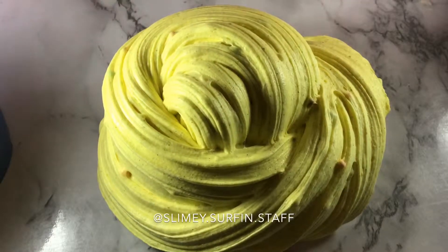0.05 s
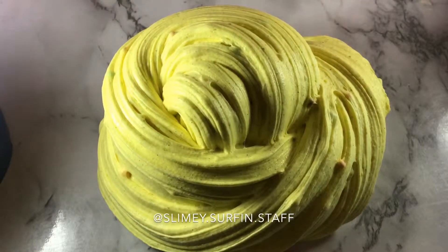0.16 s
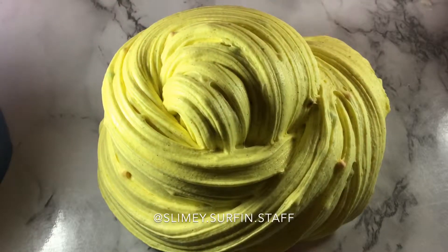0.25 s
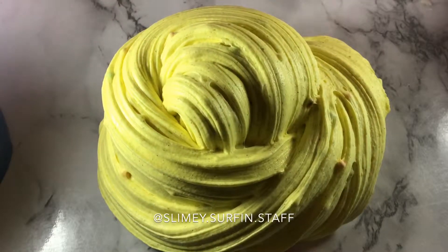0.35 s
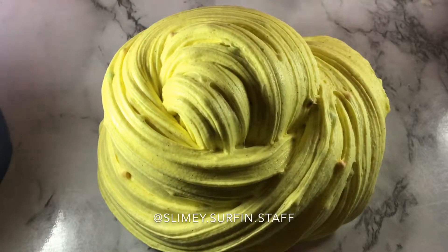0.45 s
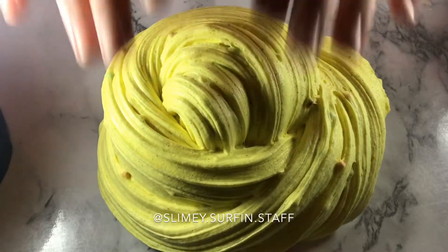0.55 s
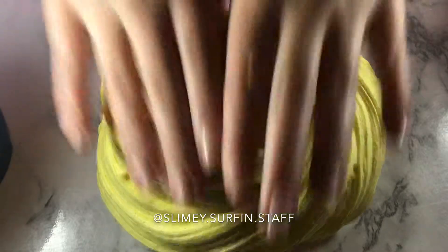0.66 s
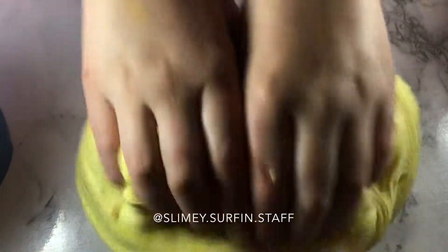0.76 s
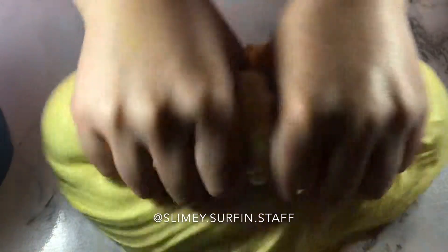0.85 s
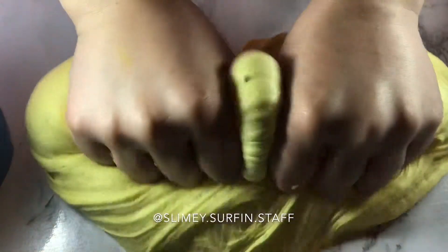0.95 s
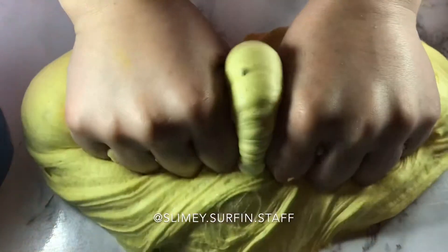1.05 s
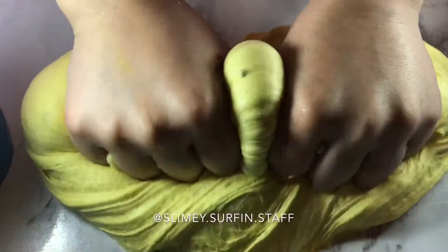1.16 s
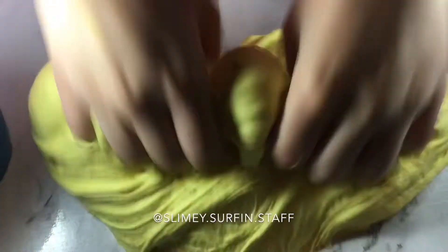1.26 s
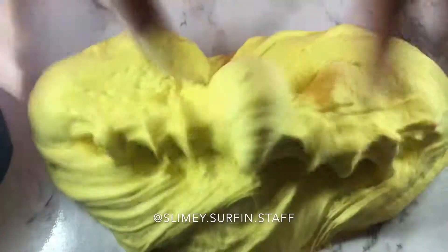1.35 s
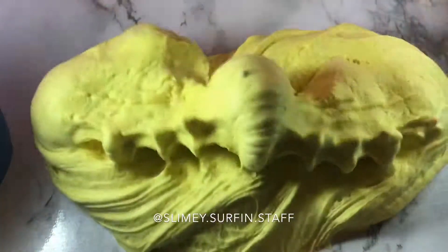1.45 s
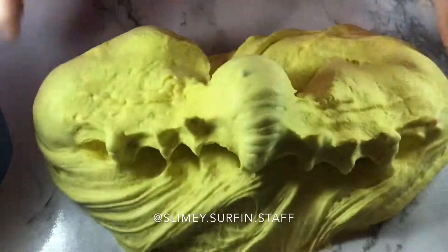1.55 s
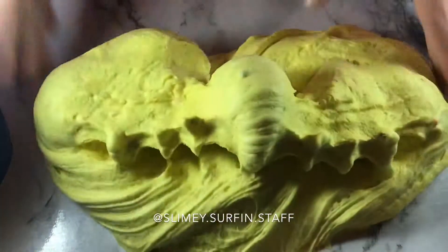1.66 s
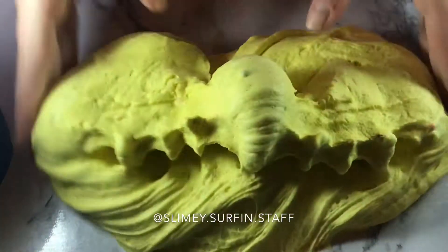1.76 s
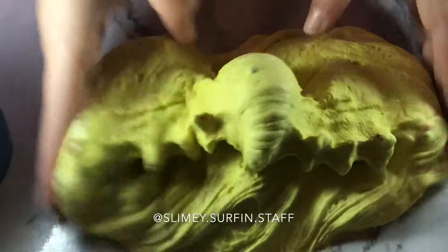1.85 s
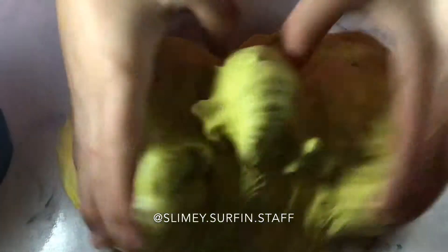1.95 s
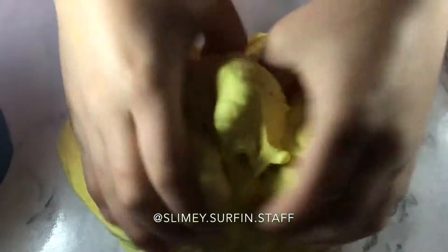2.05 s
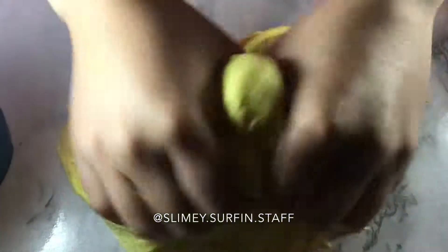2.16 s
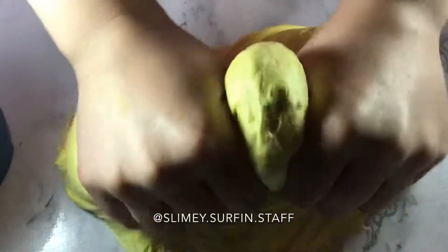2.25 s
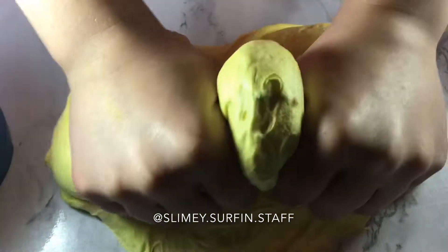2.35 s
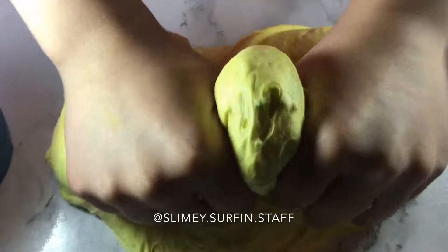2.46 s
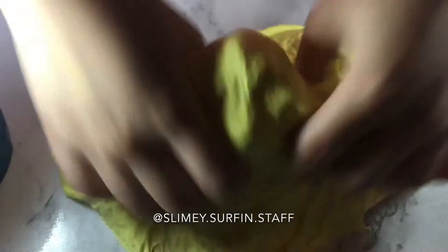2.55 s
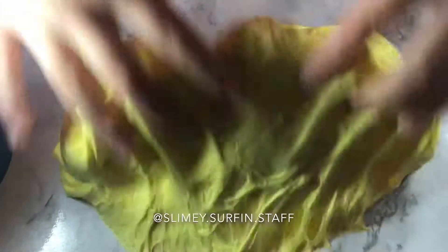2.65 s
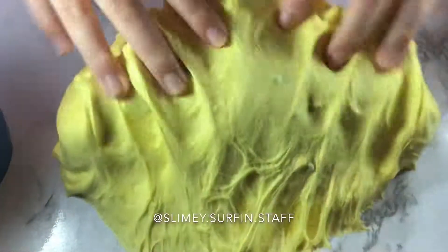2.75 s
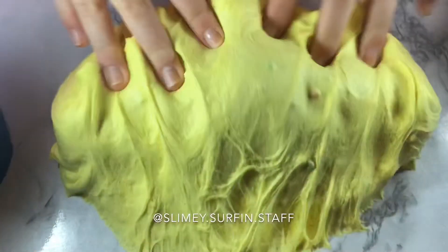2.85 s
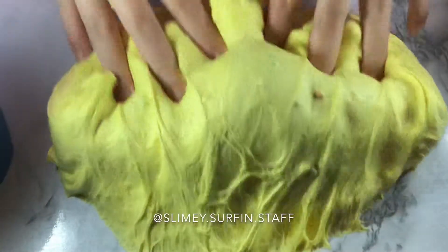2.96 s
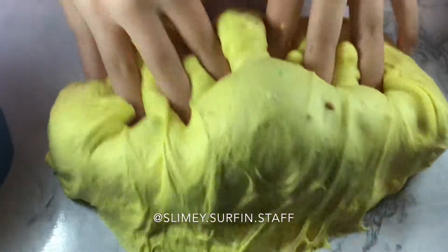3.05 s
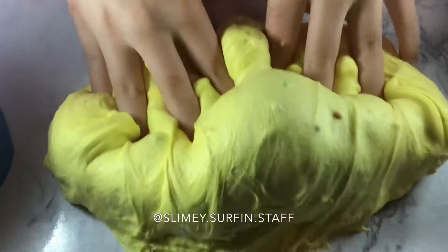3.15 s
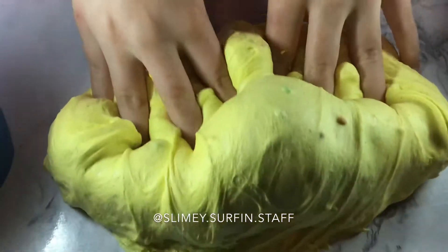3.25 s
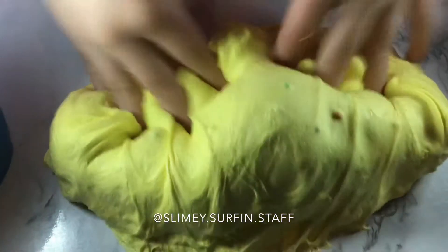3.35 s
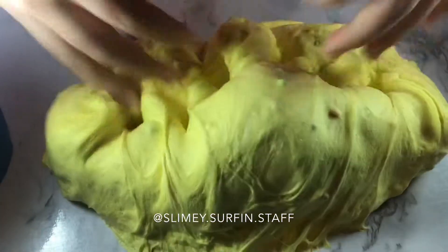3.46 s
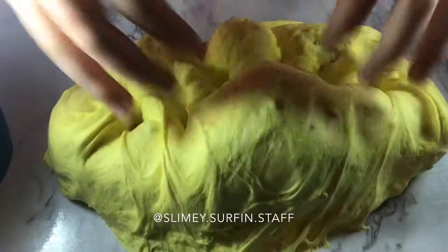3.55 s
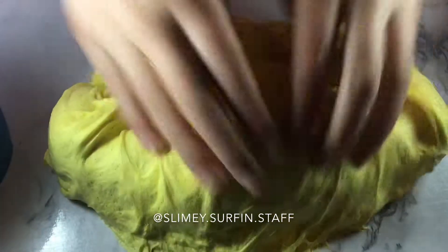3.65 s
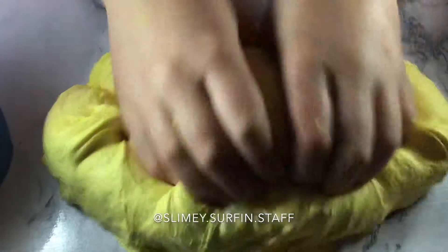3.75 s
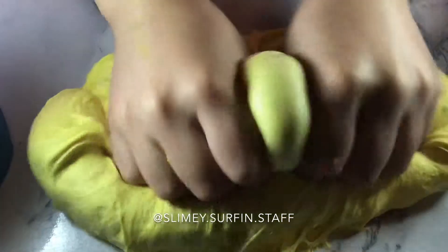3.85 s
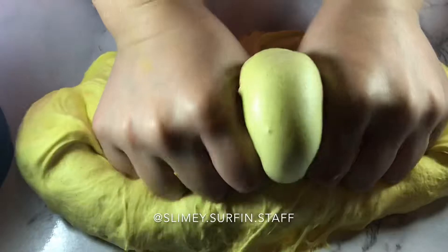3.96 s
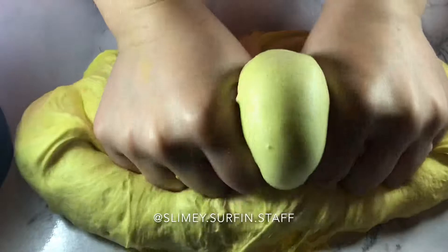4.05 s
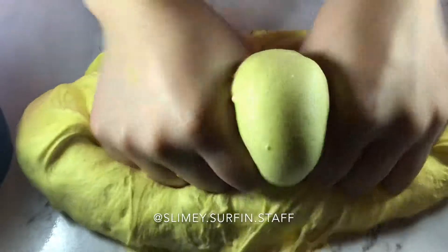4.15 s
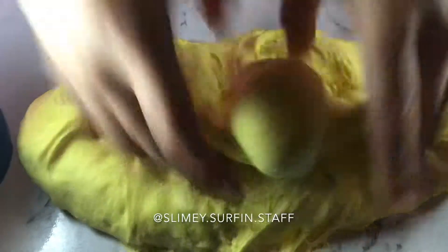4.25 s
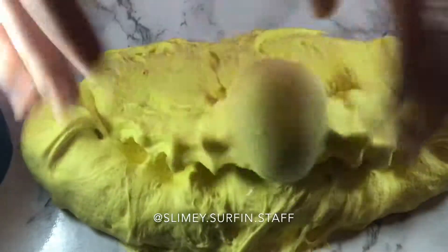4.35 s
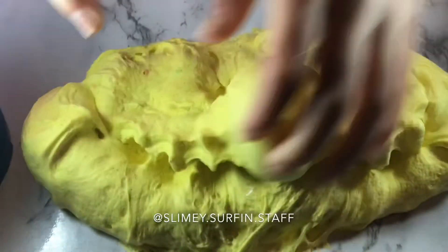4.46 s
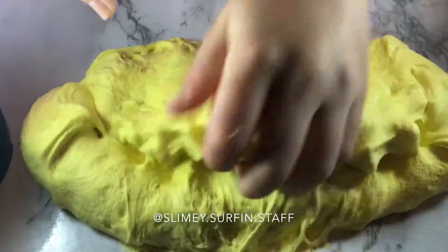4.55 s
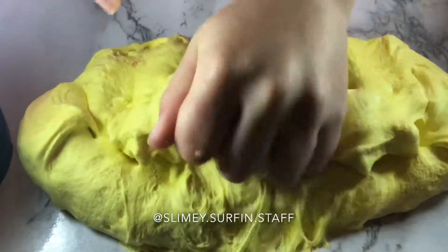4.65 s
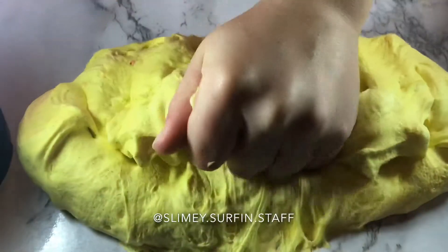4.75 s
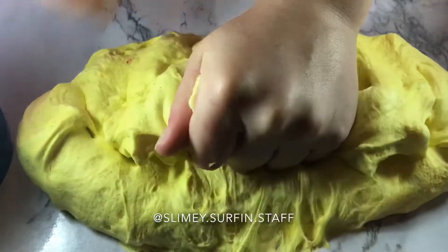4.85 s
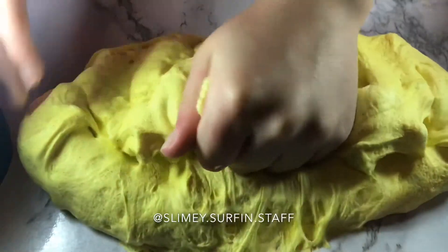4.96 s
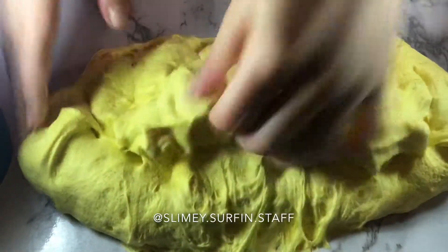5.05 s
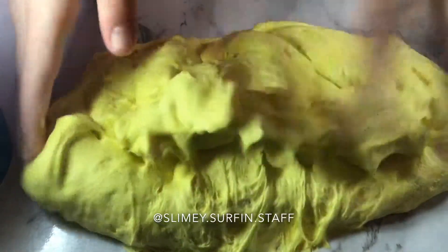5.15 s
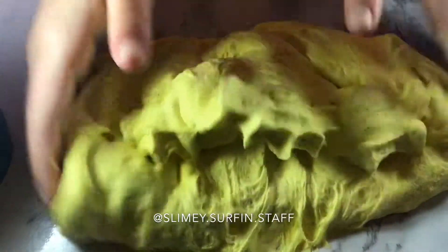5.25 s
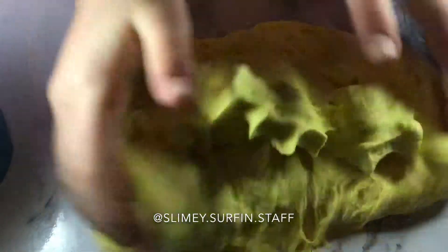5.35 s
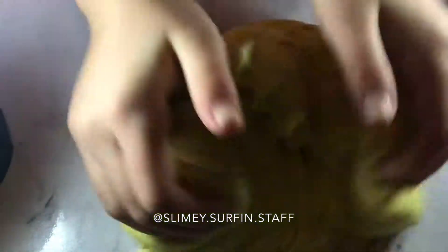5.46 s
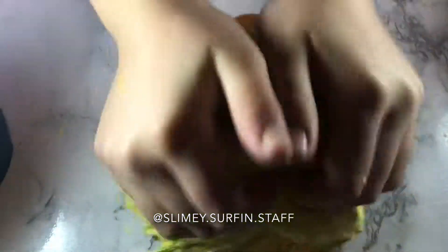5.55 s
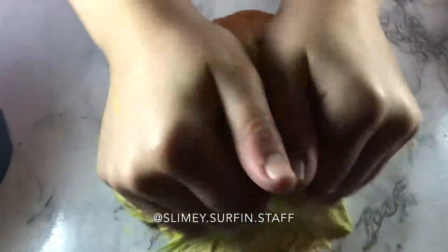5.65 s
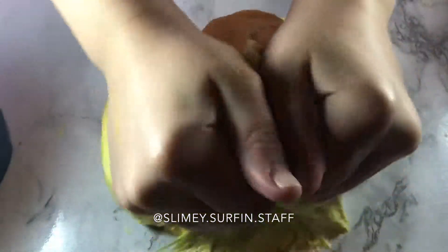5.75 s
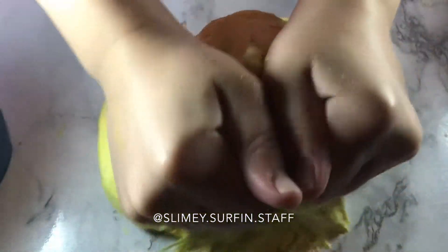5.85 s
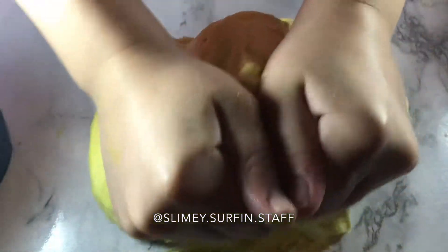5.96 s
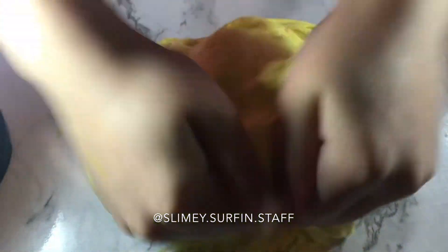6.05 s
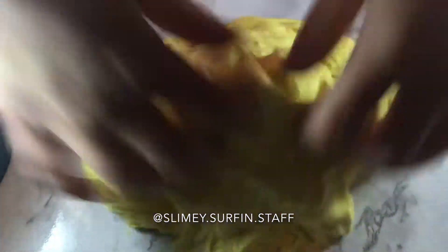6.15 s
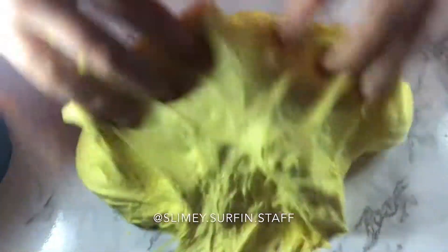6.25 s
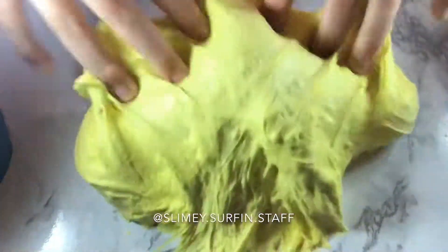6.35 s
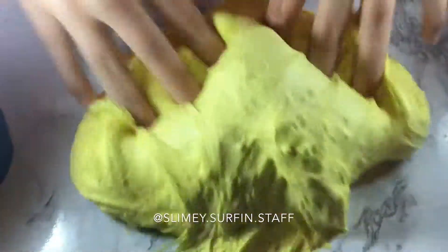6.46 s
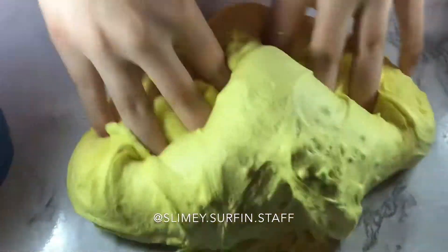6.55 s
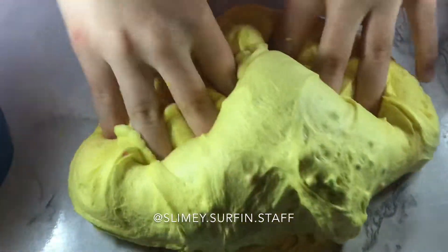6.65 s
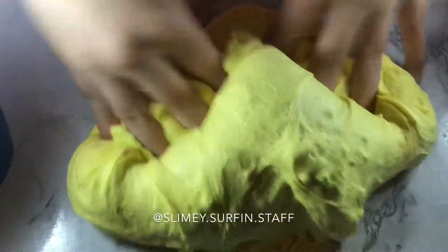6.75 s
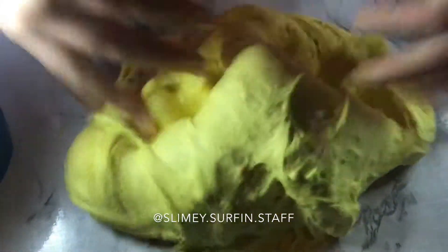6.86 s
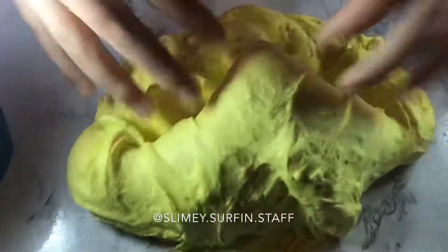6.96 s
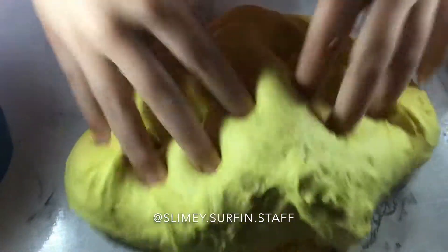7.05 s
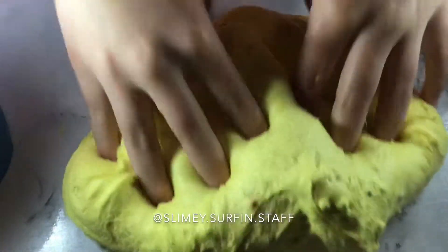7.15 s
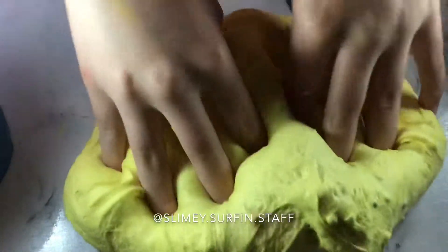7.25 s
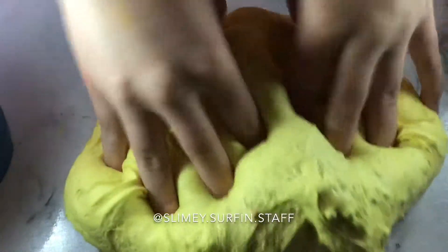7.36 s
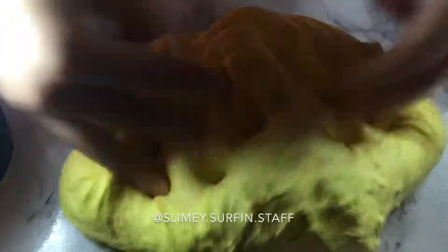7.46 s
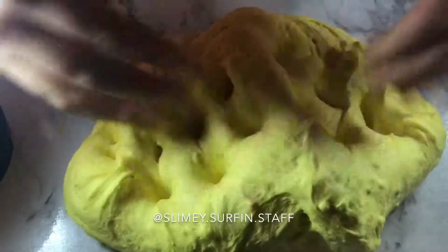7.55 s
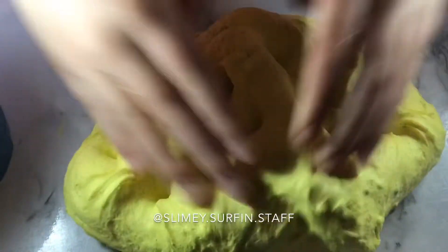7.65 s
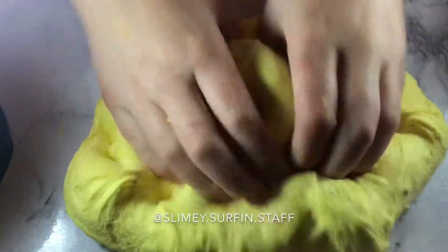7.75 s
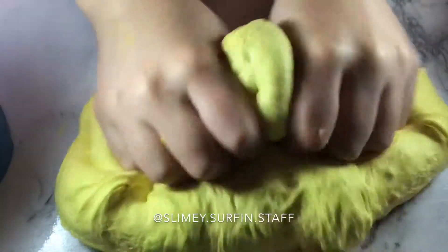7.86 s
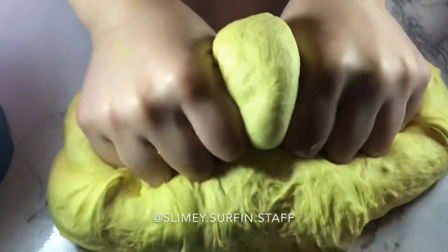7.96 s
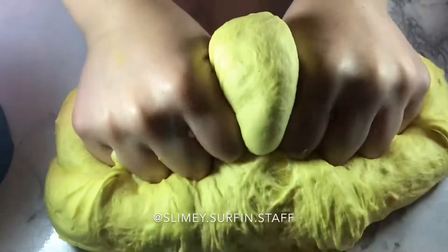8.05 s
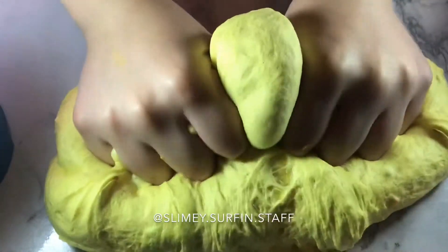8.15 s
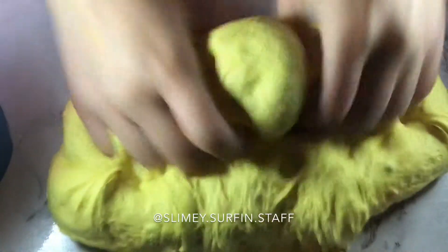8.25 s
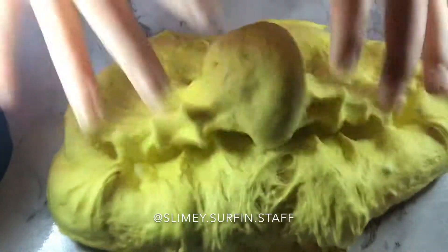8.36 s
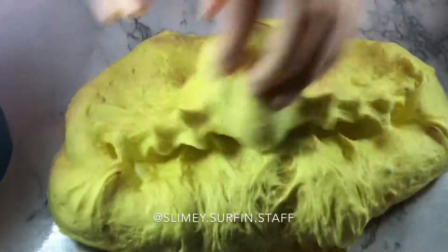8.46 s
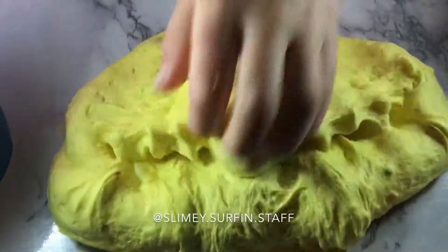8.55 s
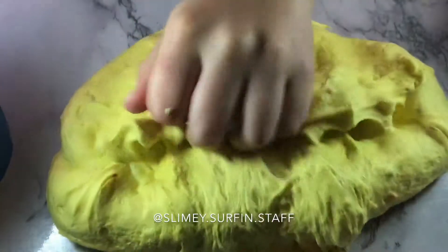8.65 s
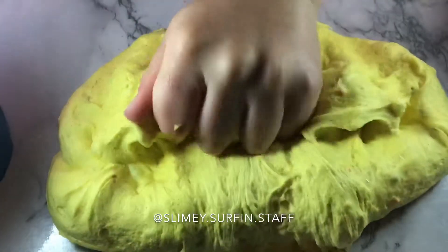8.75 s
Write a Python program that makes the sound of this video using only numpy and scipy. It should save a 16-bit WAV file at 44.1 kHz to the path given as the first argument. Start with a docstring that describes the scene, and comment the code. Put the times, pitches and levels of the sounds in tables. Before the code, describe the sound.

Thick airy slime is squeezed and pulled on a stone counter, bursting in crisp pops and fizzing crackles over a faint low hum.

```python
"""Two hands knead a lump of foamy slime on a stone counter, close to a small microphone, for 8.8 s.
Mains hum, a distant rumble and soft room noise lie below throughout, and the foam ticks even at rest.
From 0.8 s squeezes burst its air pockets: hissing fizz from tiny cells, ringing pops and puffs from larger ones.
From 1 s tugs ring as low thuds; from 1.4 s fingers peel out with a wet rush and a dull settling tail.
Air hisses harshly from a pinhole at 4.8 s; short rough whistles squeak at 5.9 s."""
import sys
import numpy as np
from scipy import signal
from scipy.fft import rfft, irfft
from scipy.io import wavfile
from scipy.ndimage import uniform_filter1d

SR = 44100
rng = np.random.default_rng(int(sys.argv[2]) if len(sys.argv) > 2 else 0)


def dump_mix(stems):
    """Bounce the given channels to the path in sys.argv[1] as a 16-bit WAV at rate SR."""
    frames = np.atleast_2d(stems).T  # one column per channel
    limited = np.clip(frames, -1, 1)  # hard clip at full scale
    pcm = np.round(limited * 32767).astype(np.int16)
    wavfile.write(sys.argv[1], SR, pcm)


def voltage_ratio(level):
    """Linear amplitude factor for a level in decibels (scalar or array-like)."""
    return 10 ** (np.asarray(level, float) / 20)


N = 388080   # samples

# fingers peeling out of the slime: start_s, hold_s, level_db, change_db over the hold,
# settle_db (level of the settling after it)
PEEL_MOVES = [(1.359, 0.052, -29.5, 1, -28), (2.632, 0.12, -31.5, -15, -42.5),
              (3.475, .08, -29.5, -11, -42.5), (4.245, 0.1, -39, 8.5, -42.5), (5.09, 0.084, -39.5, 1, -52),
              (6.129, 0.13, -39.5, -5, -54), (6.872, .07, -32, -9.5, -35.5), (7.503, 0.061, -30, -5, -41.5),
              (8.303, 0.092, -34.5, -0.5, -45)]


def rms_one(x):
    """Scales x to rms 1."""
    return x / np.sqrt(np.mean(x ** 2) + 1e-20)


def in_time(rows):
    """Straight lines through rows of (s, values), read at every sample."""
    s, *columns = np.transpose(rows)
    return [np.interp(np.arange(N) / SR, s, c) for c in columns]


def coloured(x, spectrum):
    """Weights x by a spectrum (Hz, relative dB per Hz), straight over log frequency; rms 1."""
    hz = np.maximum(np.fft.rfftfreq(N, 1 / SR), 1)
    points = np.array(spectrum)
    gain_db = np.interp(np.log(hz), np.log(points[:, 0]), points[:, 1])
    return rms_one(irfft(rfft(x) * voltage_ratio(gain_db), N))


def drift(rate_hz):
    """Slow random wander of rms 1, mostly below rate_hz."""
    r = np.exp(-2 * np.pi * rate_hz / SR)
    wander = signal.lfilter([1], [1, -2 * r, r * r], rng.standard_normal(N + SR))
    return rms_one(wander[SR:])   # the first second lets the filter settle


def ring(x, hz, cycles):
    """A resonance: a unit click rings about 1 high and dies 60 dB in so many cycles."""
    r = voltage_ratio(-60 * hz / (cycles * SR))
    w = 2 * np.pi * min(hz, .45 * SR) / SR
    return signal.lfilter([0, np.sin(w)], [1, -2 * r * np.cos(w), r * r], x + 1e-18)


def clicks(per_s, spread_db):
    """Random clicks of either sign, mostly small, a few large."""
    sizes = voltage_ratio(spread_db * np.minimum(rng.exponential(1, N), 4)) * rng.choice([-1, 1], N)
    return sizes * (rng.random(N) < per_s / SR)


def add(out, s, piece):
    """Lays a piece into out at s seconds."""
    at = round(s * SR)
    out[at:at + len(piece)] += piece[:N - at]


def patches(spectrum, per_s, spread_db, hiss_db, shared, patchy_db):
    """Noise in narrow bands, each lit by its own short bursts and by shared ones, swelling unevenly; rms 1."""
    out, edges, white = 0, np.geomspace(130, 16500, 13), rng.standard_normal((2, N))
    common = np.abs(clicks(per_s, spread_db))
    for k, (low, high) in enumerate(zip(edges, edges[1:])):
        fade = np.exp(-1 / (SR * (0.00061 + 0.55 / low)))   # low bursts last longer
        own = np.abs(clicks(per_s, spread_db))
        bursts = signal.lfilter([1], [1, -fade], shared * common + own)
        band_pass = signal.butter(2, [low, high], "band", fs=SR, output="sos")
        band = signal.sosfilt(band_pass, white[k % 2])
        swell = voltage_ratio(patchy_db * drift(40))
        lit = rms_one(band * (rms_one(bursts) + voltage_ratio(hiss_db)) * swell)
        out = out + lit * np.sqrt(high - low)
    return coloured(out, spectrum)


def gesture(start, hold, rise, fall, level_db, change_db):
    """Level in dB of one hand movement: a straight rise, a sloping hold, a straight fall."""
    fade_db = 20   # gained over one rise time, lost over one fall time
    far = 10       # rise or fall times drawn before the level stays flat
    end_db = level_db + change_db
    return in_time([(start - far * rise, level_db - far * fade_db),
                    (start, level_db),
                    (start + hold, end_db),
                    (start + hold + far * fall, end_db - far * fade_db)])[0]


def together(levels_db):
    """Levels in dB add as powers."""
    return 10 * np.log10(sum(voltage_ratio(2 * level) for level in levels_db))


def room():
    """Mains hum that wavers a little, a distant rumble as low resonant noise, and soft broad noise."""
    # mains tones: pitch_hz, level_db (rms)
    hum_tones = [(120, -55.5), (240, -77.5)]
    # colour of the room noise: frequency_hz, relative_db_per_hz
    room_colour = [(88, -29), (150, -8), (193, -12), (235, -1.5), (270, -8), (601, -18), (3620, -25.5),
                   (7470, -29), (16000, -28.5)]
    t = np.arange(N) / SR
    waver = voltage_ratio(0.41 * drift(7.7))
    hum = sum(voltage_ratio(level_db) * np.sqrt(2) * np.sin(2 * np.pi * hz * t) for hz, level_db in hum_tones)
    rumble = ring(rng.standard_normal(N), 68, cycles=1.3)
    rumble = signal.sosfilt(signal.butter(2, 40, "high", fs=SR, output="sos"), rumble)
    soft = coloured(rng.standard_normal(N), room_colour)
    return waver * hum + voltage_ratio(-59.5) * rms_one(rumble) + voltage_ratio(-68) * soft


def pressure():
    """Fizz level below and above 6 kHz from squeezes, peels and rest; peeling out ends a squeeze."""
    # hands pressing the foam: peak_s, rise_s and fall_s (time per 20 dB), fizz_db below 6 kHz,
    # bright_db (above 6 kHz against below)
    squeezes = [(0.838, 0.036, 0.07, -42, -9.5), (0.971, 0.126, 0.28, -46.5, 3.5),
                (1.82, 0.083, .6, -66, 1.5), (2.08, 0.2, 1.05, -51, -1.5), (2.339, 0.1, 0.12, -41, 3.5),
                (2.46, 0.28, 0.059, -48.5, 2), (2.96, 0.12, 0.74, -60.5, -6),
                (3.802, 0.036, 0.36, -50, -2.5), (3.91, 0.087, 0.41, -50.5, -5.5),
                (4.05, 0.081, 0.067, -36.5, 4), (4.801, 0.068, 0.13, -38.5, -2.5),
                (4.449, 0.2, 0.073, -64, -3.5), (5.25, 0.047, 0.18, -72, -5.5),
                (5.49, .2, 0.22, -47.5, -4.5), (5.671, 0.48, .03, -50, -0.5), (5.876, 0.17, 0.12, -43, 5),
                (5.965, .2, .04, -53.5, 3), (6.301, 0.18, 1.27, -62.5, -1), (7.173, 0.096, 0.69, -57.5, -5),
                (7.801, 0.043, 0.75, -56, 0), (8.042, 0.18, 0.11, -39.5, -2), (8.17, 0.45, 0.037, -57.5, 9),
                (8.449, 0.15, 1.5, -76.5, -5), (8.8, 0.66, .1, -52.5, -6.5)]
    let_go_lag_s, let_go_s = 0.08, 0.083   # a squeeze's fizz outlasts the next peel so long, then falls
    peel_fizz_db, peel_fizz_follows = -33.5, 0.42   # the second in dB per dB of peel
    peel_edge_s, peel_bright_db = 0.057, -1
    rest_db, rest_bright_db = -81, -9   # the untouched foam still ticks
    parts = [(rest_db, rest_bright_db)]
    for s, rise, fall, db, bright in squeezes:
        peel_ends = [start + hold for start, hold, *_ in PEEL_MOVES if start > s]
        out_s = min(peel_ends + [N / SR])
        squeeze = gesture(s, 1e-4, rise, fall, db, 0)
        let_go = gesture(0, out_s + let_go_lag_s, 1, let_go_s, 0, 0)
        parts.append((squeeze + let_go, bright))
    for s, hold, db, change, _ in PEEL_MOVES:
        level_db = peel_fizz_db + peel_fizz_follows * db
        parts.append((gesture(s, hold, peel_edge_s, peel_edge_s, level_db, change), peel_bright_db))
    return together(db for db, _ in parts), together(db + bright for db, bright in parts)


def fizz(middle_db, treble_db):
    """Tiny foam cells burst under pressure in many short patches of noise, on a fine hiss."""
    # colour of the fizz before its two halves are levelled: frequency_hz, relative_db_per_hz
    fizz_colour = [(88, -33.5), (150, -9.5), (179, 2.5), (422, -8), (979, -8), (3160, -10), (5910, -11.5),
                   (10600, -15), (14800, -13), (16000, -26.5)]
    cells = patches(fizz_colour, per_s=160, spread_db=4.2, hiss_db=-2.5, shared=0.9, patchy_db=2)
    middle = signal.filtfilt(*signal.butter(2, 6000, fs=SR), cells)
    return voltage_ratio(middle_db) * rms_one(middle) + voltage_ratio(treble_db) * rms_one(cells - middle)


def small_pops(middle_db, treble_db, tear_db):
    """Lesser pockets of any size burst at random, as loud as the pressure or peeling of the moment."""
    per_s = 40
    pop_db, spread_db = 11.5, 3   # above the fizz; added dB per e-fold of rarity
    air_db, peel_pop_db = -6, 9   # air above 6 kHz against pop_db; pop above the peeling rush
    s, size, pitch, air = rng.random((round(per_s * N / SR), 4)).T
    at = (s * N).astype(int)
    over_db = pop_db - spread_db * np.log(.03 + .97 * size)
    ring_db = together([middle_db, tear_db + peel_pop_db - pop_db])[at] + over_db
    puff_db = treble_db[at] + over_db + air_db + 12 * (air - .5)
    return list(zip(at / SR, ring_db, 600 * 10 ** pitch, puff_db))


def pops(small):
    """A pocket wall snaps and rings for a cycle or two, then tears on faintly; air puffs out."""
    # listed bursting air pockets, from loud pops to faint ticks:
    # start_s, ring_db (peak), pocket_hz, air_db (escaping air)
    listed_pops = [(0.8189, -34.5, 820, -39.5), (0.8491, -10.5, 5530, -18.5), (0.8992, -20.5, 4570, -38.5),
                   (0.961, -20.5, 795, -19), (0.9914, -17, 864, -14), (1.0234, -10.5, 5830, -30),
                   (1.1333, -34.5, 3100, -38), (1.3648, -17.5, 820, -19), (1.399, -16, 900, -27.5),
                   (1.4745, -32.5, 1400, -44.5), (1.5272, -38, 1330, -60), (1.699, -53, 686, -61.5),
                   (2.1633, -33, 2070, -35.5), (2.208, -31, 806, -37), (2.288, -35, 2840, -22.5),
                   (2.313, -32.5, 935, -20), (2.3369, -33, 1070, -15), (2.3423, -37.5, 2700, -19.5),
                   (2.3634, -29.5, 1170, -16.5), (2.4075, -21, 2480, -19), (2.4451, -22, 824, -9),
                   (2.4597, -28.5, 980, -25), (2.4826, -33, 2380, -31.5), (2.9441, -31, 1260, -34),
                   (3.4789, -17.5, 820, -41.5), (3.514, -17, 470, -32), (3.5422, -14, 1000, -37),
                   (3.865, -42, 4630, -27.5), (3.8828, -31.5, 734, -17.5), (3.8892, -21.5, 2940, -20),
                   (3.907, -16.5, 4450, -37), (3.935, -25, 3360, -38), (3.9787, -32, 3210, -27.5),
                   (4.0027, -20.5, 890, -19), (4.0024, -6, 4600, -22), (4.0302, 4, 4830, -26),
                   (4.0433, -7, 5050, -9), (4.048, -13, 900, -3.5), (4.072, -6.5, 3980, -17),
                   (4.1382, -35, 5530, -25), (4.2656, -23.5, 990, -34.5), (4.347, -22, 1290, -32.5),
                   (4.622, -40, 4000, -41), (4.7139, -39, 730, -20), (4.7597, 0, 1004, -22.5),
                   (4.8033, -11, 780, -10.5), (4.8288, -7, 4870, -25), (4.8417, -32, 2940, -28.5),
                   (4.8486, -1, 3190, -25), (4.9083, -43, 634, -28.5), (4.9473, -19.5, 3440, -30),
                   (4.972, -34.5, 3250, -53), (5.1038, -25, 744, -43), (5.5551, -33, 870, -50.5),
                   (5.665, -29, 1180, -50.5), (5.732, -31.5, 4900, -39.5), (5.757, -33.5, 2480, -44.5),
                   (5.7696, -23, 1250, -18), (5.8242, -25.5, 790, -13.5), (5.8356, -32, 840, -21),
                   (5.8457, -32, 5460, -22), (5.8535, -20, 3380, -15.5), (5.8803, -7, 2340, -2),
                   (5.902, -21, 3050, -11.5), (5.9267, -14, 5170, -9), (5.9423, -19.5, 3000, -21),
                   (5.9681, -33.5, 3160, -23), (6.2731, -43.5, 4190, -32), (6.834, -34, 2480, -34.5),
                   (6.8728, -16.5, 2130, -51.5), (6.884, -7, 2130, -27), (6.9083, -17.5, 582, -15.5),
                   (6.9325, -20.5, 958, -32.5), (7.019, -44, 686, -59), (7.19, -34.5, 780, -47.5),
                   (7.3751, -29, 5100, -49.5), (7.459, -42, 3500, -40.5), (7.4992, -20, 1840, -25),
                   (7.5238, -5.5, 3000, -19.5), (7.5311, -25, 1210, -19.5), (7.5462, -11.5, 644, -19),
                   (7.928, -21.5, 4100, -46), (7.9628, -17.5, 2930, -30), (7.9734, -28, 5960, -10.5),
                   (8.014, -11.5, 2530, -16), (8.0246, -25.5, 3100, -16), (8.0342, -8.5, 5670, -17),
                   (8.0412, -22.5, 2380, -13), (8.0559, -1, 4300, -6.5), (8.1583, -28, 3300, -28),
                   (8.296, -31.5, 1000, -39), (8.322, -23, 800, -38.5), (8.344, -15, 3000, -29),
                   (8.388, -27, 1020, -35), (8.7478, -15.5, 5750, -21.5)]
    rows = small + listed_pops
    out, t = np.zeros(N), np.arange(round(.04 * SR)) / SR
    chance = rng.standard_normal((len(rows), 2, len(t)))
    hiss = signal.butter(2, [6000, 16000], "band", fs=SR, output="sos")
    for (s, pocket_db, hz, air_db), (tear, air) in zip(rows, chance):
        snap = (t == 0) + .09 * np.sqrt(hz / 5000) * tear * voltage_ratio(-60 * t / .025)
        pocket = ring(np.diff(snap, prepend=0), hz, cycles=3.5)
        pocket = ring(pocket, 1.24 * hz, cycles=0.6)
        escape = voltage_ratio(-60 * t / 0.0031) + 0.18 * voltage_ratio(-60 * t / 0.015)   # a quick puff and a weaker trail
        puff = signal.sosfilt(hiss, air * escape)
        pocket = voltage_ratio(pocket_db) * pocket / np.abs(pocket).max()
        add(out, s, pocket + voltage_ratio(air_db) * puff * np.sqrt(2))
    return out


def small_tugs(tear_db, settle_db):
    """Lesser tugs at random times, raised while skin tears free, most in a loud peel, and while settling."""
    per_s = 55
    tug_db, follows, spread_db = -18, 2.6, 3.5   # in the loudest peel; dB per dB of peel; dB per e-fold
    s, size = rng.random((round(per_s * N / SR), 2)).T
    at = (.002 * SR + s * (N - .002 * SR)).astype(int)
    pull_db = tug_db + follows * (tear_db - tear_db.max())
    peak_db = together([pull_db, settle_db])[at] + spread_db * np.log(.03 + size)
    return list(zip(at / SR, peak_db))


def thuds(small):
    """A soft tug, one cycle long, excites a low ring; each thud's pitch is scattered a little at random."""
    # listed thuds of the lump, during peels and with some large pops: start_s, peak_db
    listed_thuds = [(0.96, -25.5), (1.354, -18.5), (1.37, -18.5), (1.398, -23), (1.502, -32), (2.642, -23),
                    (2.693, -26), (3.479, -12.5), (3.497, -17.5), (3.514, -22), (3.543, -23.5),
                    (4.03, -27.5), (4.071, -28), (4.271, -21.5), (4.289, -17), (4.332, -21.5),
                    (4.764, -13.5), (4.809, -26.5), (5.1, -28), (5.137, -22.5), (5.879, -26),
                    (6.884, -22.5), (6.912, -22), (6.939, -27.5), (7.51, -21.5), (7.536, -24), (8.038, -29),
                    (8.296, -26), (8.32, -21.5), (8.346, -18.5), (8.389, -36)]
    # the low resonance of counter or microphone body that each thud excites, before the random scatter
    body_hz = 244.5
    rows = small + listed_thuds
    out, t = np.zeros(N), np.arange(round(.08 * SR)) / SR
    for (s, peak_db), scatter in zip(rows, rng.standard_normal(len(rows))):
        hz = body_hz * (1 + 0.08 * scatter)
        tug = np.sin(2 * np.pi * hz * t) * (t < 1 / hz)
        upper = voltage_ratio(-2.5) * ring(tug, 1.3 * hz, cycles=13.0)   # a weaker upper mode
        thud = ring(tug, hz, cycles=11.0) + upper
        add(out, s - .001, -voltage_ratio(peak_db) * thud / np.abs(thud).max())
    return out


PEEL_FALL_S = .028   # the rush falls, and the settling rises, 20 dB in this time


def tearing():
    """Level of the peeling rush, in dB, while skin tears free."""
    rise_s = .018
    return together(gesture(s, hold, rise_s, PEEL_FALL_S, db, change)
                    for s, hold, db, change, _ in PEEL_MOVES)


def settling():
    """Level of the low wet movement, in dB, that dies away after each peel."""
    settle_s = .22
    return together(gesture(s + hold, 1e-4, PEEL_FALL_S, settle_s, db, 0)
                    for s, hold, _, _, db in PEEL_MOVES)


def peeling(tear_db, settle_db):
    """Sticky skin tears free in a dense wet rush; its low part stays on while the lump settles."""
    # colour of the peeling: frequency_hz, relative_db_per_hz
    peel_colour = [(59, -32), (100, -18), (234, -3), (502, -17.5), (736, -8.5), (1230, -18), (1360, -23),
                   (2370, -20), (12900, -27), (16000, -37.5)]
    rush = patches(peel_colour, per_s=110, spread_db=3.0, hiss_db=0.5, shared=0.79, patchy_db=3.0)
    dull = signal.sosfilt(signal.butter(2, 1000, fs=SR, output="sos"), rush)
    return voltage_ratio(tear_db) * rush + voltage_ratio(settle_db - 14) * dull


def squeaks():
    """Air squeezed through a pinhole, a falling tone under random flutter: harsh hiss or rough whistle."""
    # pinholes: start_s, length_s, start_hz, end_hz, level_db (before the flutter),
    # roughness (scale of the noise behind the flutter, before smoothing)
    pinholes = [(4.807, .007, 9000, 5500, -20, 1.5), (4.805, .013, 14500, 12500, -19, 4.0),
                (5.8615, .005, 9000, 8300, -19, .5), (5.8655, .004, 15000, 11500, -17, 1.0)]
    out = np.zeros(N)
    for s, length, start_hz, end_hz, level_db, rough in pinholes:
        hz = np.linspace(start_hz, end_hz, round(length * SR))
        flutter = 1 + rough * uniform_filter1d(rng.standard_normal(len(hz)), size=6)
        tone = np.sin(2 * np.pi * np.cumsum(hz) / SR)
        add(out, s, voltage_ratio(level_db) * np.hanning(len(hz)) ** .5 * flutter * tone)
    return out


def scene():
    """The hands' pressure and peeling drive every sound of the slime but its listed pops, thuds and squeaks."""
    press = pressure()
    tear_db, settle_db = tearing(), settling()
    foam = fizz(*press) + pops(small_pops(*press, tear_db))
    lump = thuds(small_tugs(tear_db, settle_db)) + peeling(tear_db, settle_db)
    return (room() + foam + lump + squeaks())[None]


def top_cut(x):
    """Nothing passes above the cut-off."""
    return signal.sosfilt(signal.butter(12, 16820, fs=SR, output="sos"), x)


def record(dry):
    """The microphone port cuts two narrow dips in the treble; the deepest bass is filtered out."""
    # dips of the port: centre_hz, width_hz, dip_db
    port_dips = [(10450, 1300, -5), (7730, 800, -2.5)]
    for hz, width_hz, dip_db in port_dips:
        dry = dry + (voltage_ratio(dip_db) - 1) * signal.lfilter(*signal.iirpeak(hz, hz / width_hz, SR), dry)
    dry = signal.sosfilt(signal.butter(4, 48, "high", fs=SR, output="sos"), dry)
    mix = np.clip(dry, -.95, .95)
    return top_cut(mix)


dry = scene()
out = record(dry)
dump_mix(out)
```